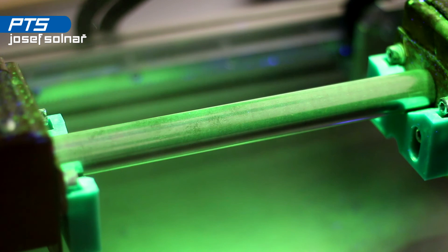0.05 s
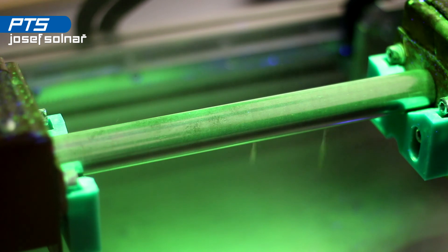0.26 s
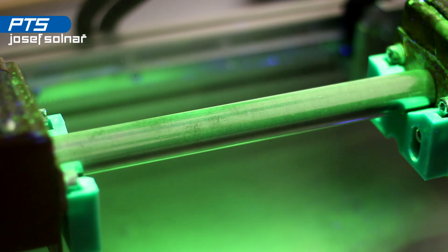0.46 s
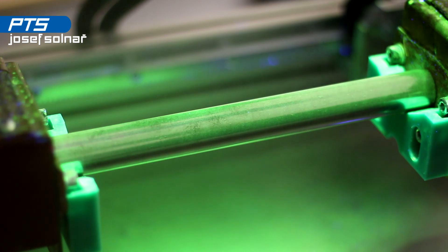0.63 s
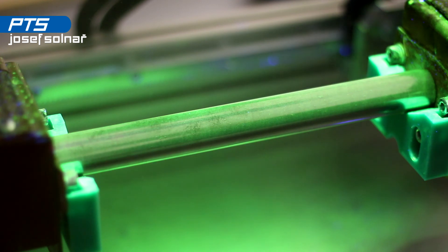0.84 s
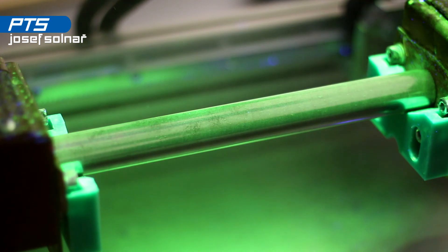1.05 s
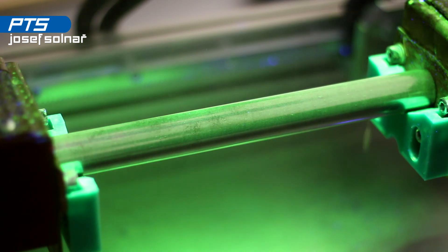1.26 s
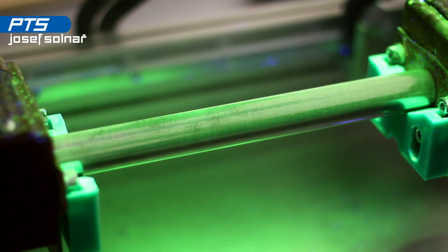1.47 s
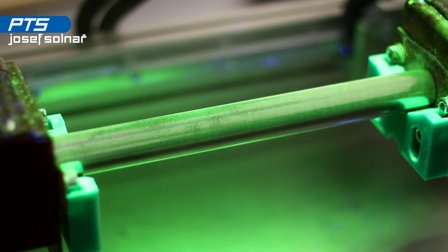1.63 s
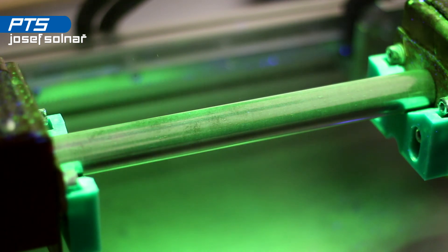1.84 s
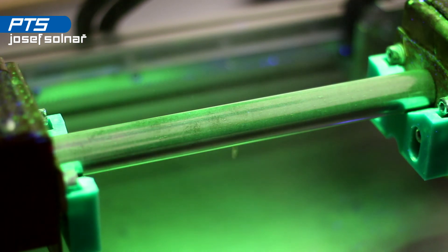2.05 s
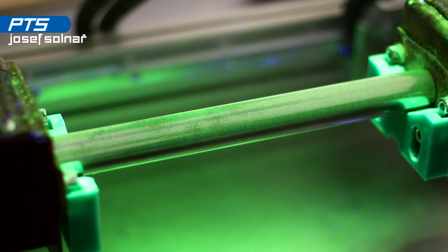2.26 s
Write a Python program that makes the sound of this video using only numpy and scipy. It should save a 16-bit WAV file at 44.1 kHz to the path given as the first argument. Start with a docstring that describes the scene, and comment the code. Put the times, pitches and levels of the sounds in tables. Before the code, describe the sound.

A steady low electrical hum with a thin buzz comes from a magnetizer, heard up close in a workshop. One loud, slightly distorted clunk rings its steel frame, followed by faint clicks and dull knocks as the hum continues.

```python
"""A bench magnetizer hums and buzzes on 50 Hz mains in a workshop, close to a mono microphone.
Its iron core flexes and its loose laminations buzz. It fires once: a hard clunk with rebounds
rings the steel frame and the room, rattles loose parts and overloads the microphone.
A faint clink leads in; light ticks, soft low knocks and small taps follow, then faint rubbing."""
import sys
import numpy as np
from scipy import signal
from scipy.fft import rfft, irfft
from scipy.io import wavfile

SR = 44100
rng = np.random.default_rng(int(sys.argv[2]) if len(sys.argv) > 2 else 0)


def transcribe(signal):
    """Save signal, clipped to [-1, 1], as a 16-bit WAV file at the path in sys.argv[1]."""
    frames = np.atleast_2d(signal).T
    limited = np.clip(frames, -1, 1)
    pcm = np.round(limited * 32767).astype(np.int16)
    wavfile.write(sys.argv[1], SR, pcm)


N = 105840
T = np.arange(N) / SR
MAINS_HZ = 50.04


def undb(db):
    """Decibels to gain."""
    return 10 ** (np.asarray(db) / 20)


def unit(x):
    """Scale to rms 1."""
    return x / np.sqrt(np.mean(x ** 2))


def along(hz, table, column=1):
    """Read one column of a table on a log-frequency axis."""
    table = np.array(table)
    return np.interp(np.log(np.maximum(hz, 1)), np.log(table[:, 0]), table[:, column])


def noise(colour):
    """Noise of rms 1, shaped by an EQ curve of freq_hz, gain_db."""
    gain = undb(along(np.fft.rfftfreq(N, 1 / SR), colour))
    return unit(irfft(rfft(rng.standard_normal(N)) * gain, N))


def band_noise(lo_hz, hi_hz):
    """Noise of rms 1 between two soft edges."""
    edges = np.clip([lo_hz, max(hi_hz, lo_hz + 100)], 20, SR / 2 - 100)
    bandpass = signal.butter(2, edges, "band", fs=SR, output="sos")
    return unit(signal.sosfilt(bandpass, rng.standard_normal(N)))


def fade(start, t60_s, attack_s=1e-4):
    """Percussive envelope: a quick attack, then a decay of 60 dB per t60_s."""
    age = np.maximum(T - start, 0)
    return (1 - np.exp(-age / attack_s)) * np.exp(-np.log(1000) * age / t60_s)


def ring(start, hz, t60_s, attack_s=1e-4):
    """One struck mode: a decaying sine."""
    return np.sin(2 * np.pi * hz * (T - start)) * fade(start, t60_s, attack_s)


def hum():
    """The iron core flexes twice a mains cycle; the panels scatter the phases of the upper harmonics."""
    # harmonics of the core's flexing: harmonic_number, relative_db
    harmonics = [(1, 1.5), (2, -7), (3, -28.5), (4, -18), (5, -16), (6, -23.5), (7, -21.5), (8, -48),
                 (9, -29), (10, -22.5), (11, -36)]
    out = 0
    for (k, db), lag in zip(harmonics, rng.random(len(harmonics))):
        phase = lag if k > 2 else 0  # the two lowest peak together
        out += undb(db) * np.cos(2 * np.pi * (2 * MAINS_HZ * k * T + phase))
    return undb(-28.2) * unit(out)


def buzz():
    """Loose laminations buzz with a comb of uneven mains harmonics."""
    # outline of the comb: freq_hz, relative_db
    outline = [(1100, -11), (1600, -1), (2200, 2), (3000, -1.5), (4000, -2.5), (5300, -8.5), (7000, -10.5),
               (9500, -21), (15000, -43)]
    k = np.arange(int(outline[0][0] / MAINS_HZ), 260)
    hz = k * MAINS_HZ
    scatter, phase = rng.standard_normal((260, 2))[k].T
    odd_db = -19 * np.maximum(1 - (hz / 5000) ** 2, 0)  # odd harmonics catch up in the treble
    db = along(hz, outline) + 4.5 * np.minimum(scatter, 2) + k % 2 * odd_db
    spectrum = np.zeros(4096, complex)
    spectrum[k] = undb(db) * np.exp(2j * np.pi * phase)
    cycle = irfft(spectrum)  # wavetable of one mains cycle
    looped = np.interp(MAINS_HZ * T, np.arange(len(cycle)) / len(cycle), cycle, period=1)
    return undb(-49.5) * unit(looped)


def whines():
    """Resonating panels lift thin, steady tones out of the buzz."""
    # panel resonances: rough_pitch_hz, relative_db
    resonances = [(3601, -82), (3849, -60.5), (4102, -62), (4301, -93), (5050, -63.5), (5303, -61),
                  (5900, -61.5), (6449, -65.5), (6551, -72), (7348, -70)]
    out = 0
    for (hz, db), phase in zip(resonances, rng.random(len(resonances))):
        harmonic_hz = round(hz / MAINS_HZ) * MAINS_HZ
        out += undb(db - 1.5) * np.sqrt(2) * np.sin(2 * np.pi * (harmonic_hz * T + phase))
    return out


def air():
    """Soft, even workshop room tone."""
    # bass-heavy colour of the room: freq_hz, gain_db
    colour = [(25, 12.5), (50, 3.5), (90, 8.5), (250, 0.5), (600, -2), (1000, -8), (1400, -14.5),
              (1800, -14), (3200, -17.5), (4800, -16), (8000, -25), (15500, -28)]
    return undb(-44) * noise(colour)


def hiss():
    """Faint, steady hiss, different in each channel."""
    # colour of the hiss: freq_hz, gain_db
    colour = [(30, 3), (300, -7), (3000, -4), (8000, 0.5), (15000, 1)]
    return undb(-54.5) * np.array([noise(colour), noise(colour)])


def taps():
    """The opening clink and later small taps: a click, two brief modes and the room's answer."""
    # pitched contacts: start_s, level_db, upper_hz, lower_hz, lower_db, t60_s, room_db, attack_s
    hits = [(0.178, -41, 4510, 3960, -6, 0.27, -3.5, 0.0012), (0.777, -40, 1674, 1424, -5, .2, 3.5, 0.0065),
            (0.856, -38.5, 2210, 2030, 6.5, 0.057, -6.5, 0.00087),
            (1.096, -33, 1990, 1320, -8, 0.087, -9, 0.0011),
            (1.1903, -28.5, 6210, 5985, -2, 0.031, -21, 0.00012)]
    out = 0
    for start, db, upper_hz, lower_hz, lower_db, t60_s, room_db, attack_s in hits:
        upper = ring(start, upper_hz, t60_s, attack_s)
        lower = undb(lower_db) * ring(start, lower_hz, t60_s, attack_s)
        click = undb(-0.5) * fade(start, 0.013, attack_s)
        room = undb(room_db) * fade(start, 0.43, attack_s)
        wash = band_noise(0.83 * lower_hz, 1.15 * upper_hz)
        out += undb(db) * (upper + lower + wash * (click + room))
    return out


def body(start):
    """Machine and room ring densely after a blow, in half-octave bands; the top dies first."""
    # colour and decay of the ring: freq_hz, gain_db, t60_s
    response = [(29.8, -42, .7), (60.4, -20, 0.95), (108.5, -26, 0.31), (158, -6.5, 0.54), (275, -4, 1),
                (383, 0, 0.86), (552, -4, 1), (835, -11.5, 0.74), (1500, -5.5, 0.58), (3000, -16.5, 0.53),
                (5400, -18.5, 0.35), (7960, -31, 0.41), (15000, -52, 0.22)]
    spectrum = rfft(noise(response))
    bands = np.round(2 * np.log2(np.maximum(np.fft.rfftfreq(N, 1 / SR), 60)))
    out = 0
    for band in np.unique(bands):
        t60_s = along(2 ** (band / 2), response, column=2)
        out += irfft(spectrum * (bands == band), N) * fade(start, t60_s, attack_s=0.0019)
    return undb(-10) * out


def frame(start):
    """The struck steel frame rings, each mode beating against a close, quieter twin."""
    # modes of the frame: pitch_hz, relative_db, t60_s
    modes = [(267.6, -13, 2.1), (280.6, -16, 2.16), (334, -0.5, 1.46), (381.2, -1, 0.92), (416.1, -1.5, .8),
             (513.5, -3.5, 0.75), (548.5, -1, 0.89), (807, -13, 1.07), (899, -6.5, 1.02), (1012, -7.5, .43),
             (1516, -1, 0.63), (1927, -11, 0.28), (2119, -7.5, 0.67)]
    out = 0
    for (hz, db, t60_s), (lag, twin_lag, spread) in zip(modes, rng.random((len(modes), 3))):
        beat_hz = 7.02 * (0.5 + spread)
        main = ring(start + lag / hz, hz, t60_s)
        twin = undb(-5) * ring(start + twin_lag / hz, hz + beat_hz, t60_s)
        out += undb(db) * (main + twin)
    return undb(-19) * out


def clunk():
    """A blow and its rebounds: each cracks, shakes the machine and rings the frame."""
    # blows as the magnetizer fires: start_s, relative_ring_db, relative_crack_db
    blows = [(0.2467, 0.5, 0), (0.2518, -4, -7), (0.279, -4.5, -10), (0.345, -6, -32), (0.369, -11.5, -19)]
    # colour of the contact itself: freq_hz, gain_db
    crack_colour = [(50, -35), (150, -18), (600, 6), (1800, 4), (3200, -11.5), (5800, -1.5), (8000, -13),
                    (15000, -22.5)]
    out = 0
    for start, ring_db, crack_db in blows:
        out += undb(ring_db) * (body(start) + frame(start))
        out += undb(crack_db - 2.5) * noise(crack_colour) * fade(start, t60_s=0.049)
    return out


def rattle():
    """Loose parts chatter between the rebounds, weaker as the machine settles."""
    # bright colour of the chatter: freq_hz, gain_db
    colour = [(1000, 4), (2500, 10.5), (5500, 6), (8000, -7.5), (12000, -6), (15500, -32)]
    start_s, end_s, contacts_per_s, settle_db_per_s = 0.255, 0.392, 220, 50
    gaps, sizes = rng.random((80, 2)).T
    onsets = start_s + np.cumsum(2 * gaps) / contacts_per_s
    contacts = sum((0.5 + size) * fade(onset, t60_s=0.018)
                   for onset, size in zip(onsets, sizes) if onset < end_s)
    settling = undb(-23.5 - settle_db_per_s * (T - start_s))
    return settling * noise(colour) * contacts


def ticks():
    """Bright, toneless ticks with a short room tail."""
    # light contacts: start_s, level_db, low_cut_hz
    hits = [(0.5938, -40, 3911), (0.6519, -47, 5750), (0.771, -43.5, 2950), (0.78, -39, 700),
            (0.8, -43, 1200), (0.8112, -42, 1500), (0.845, -45, 5000), (0.8546, -38, 1400)]
    out = 0
    for start, db, low_cut_hz in hits:
        envelope = fade(start, t60_s=0.044) + undb(-7) * fade(start, t60_s=0.37)
        out += undb(db) * band_noise(low_cut_hz, hi_hz=10185) * envelope
    return out


def knocks():
    """Dull knocks, each with one main ring, leave the frame booming."""
    # soft knocks in the frame: start_s, level_db, pitch_hz
    hits = [(0.808, -31.5, 473), (0.882, -36, 327), (0.955, -35.5, 323)]
    # dark colour of the boom: freq_hz, gain_db
    colour = [(120, -12), (230, 1), (330, 4.5), (500, 0.5), (700, -15.5), (1500, -22.5), (4000, -44)]
    out = 0
    for start, db, hz in hits:
        boom = noise(colour) * fade(start, t60_s=1.56, attack_s=0.002)
        tone = undb(4) * ring(start, hz, t60_s=0.46, attack_s=0.002)
        out += undb(db) * (boom + tone)
    return out


def rub():
    """A faint rubbing swells slowly and stops more quickly."""
    # peaky colour of the friction: freq_hz, gain_db
    colour = [(700, -22), (1100, -12), (1350, 4.5), (1700, -11), (2300, -4), (3200, -18), (4400, -5),
              (5500, -13.5), (8000, -18), (15000, -39)]
    peak_s, swell_s, release_s = 1.93, 0.7, 0.15
    width_s = np.where(T < peak_s, swell_s, release_s)
    return undb(-51.5) * noise(colour) * np.exp(-((T - peak_s) / width_s) ** 2)


def scene():
    """A mono mix of the steady bed and the hits; only the hiss differs between the channels."""
    bed = hum() + buzz() + whines() + air() + rub()
    hits = clunk() + rattle() + ticks() + knocks() + taps()
    return bed + hits + hiss()


def record(dry):
    """Overload flattens the peaks at full scale; filters then cut the deep bass and the top."""
    knee, low_cut_hz, high_cut_hz = 5.0, 50.6, 15800
    clipped = dry / (1 + np.abs(dry) ** knee) ** (1 / knee)
    highpass = signal.butter(2, low_cut_hz, "high", fs=SR, output="sos")
    lowpass = signal.ellip(10, 0.2, 80, high_cut_hz, fs=SR, output="sos")
    return signal.sosfilt(lowpass, signal.sosfilt(highpass, clipped))


dry = scene()
out = record(dry)
transcribe(out)
```